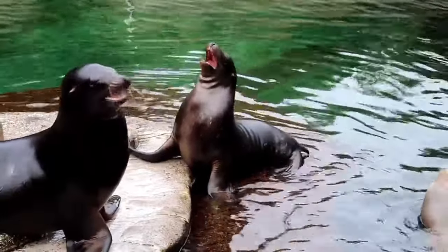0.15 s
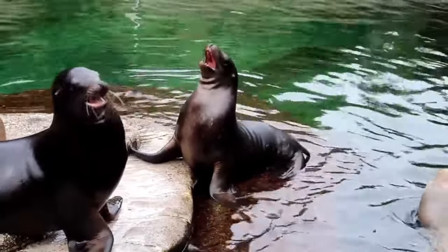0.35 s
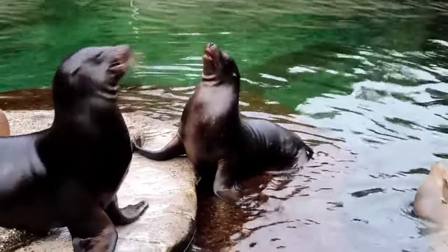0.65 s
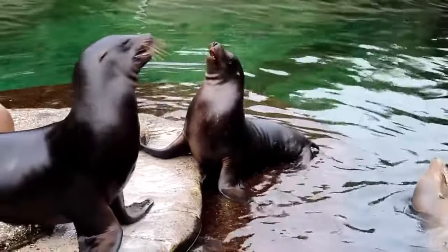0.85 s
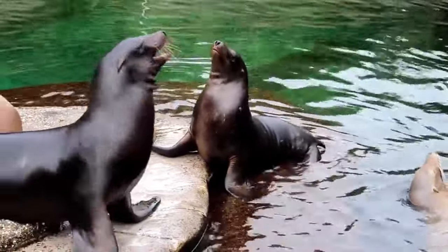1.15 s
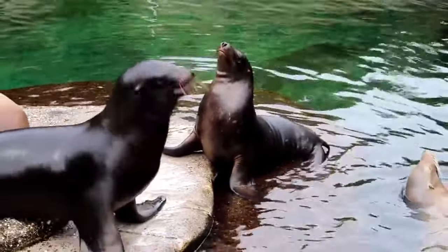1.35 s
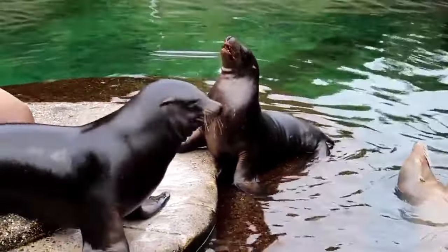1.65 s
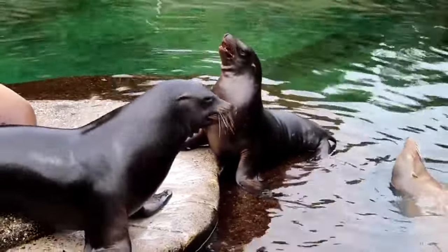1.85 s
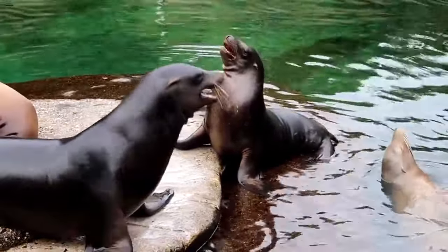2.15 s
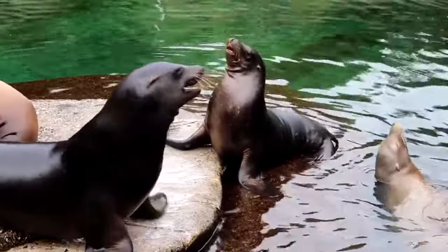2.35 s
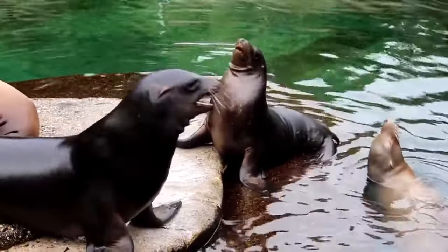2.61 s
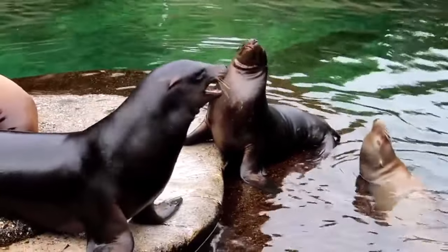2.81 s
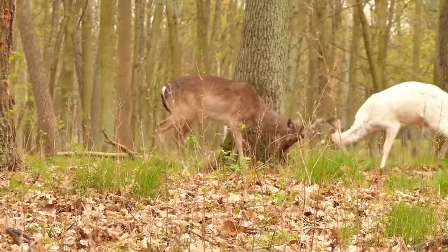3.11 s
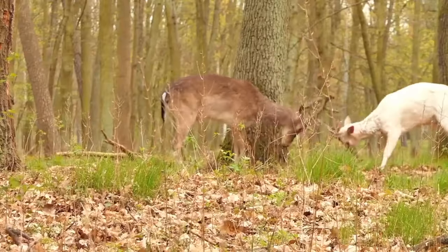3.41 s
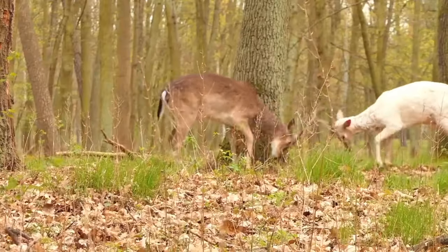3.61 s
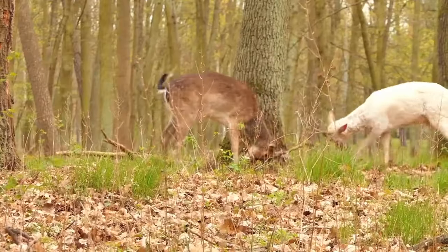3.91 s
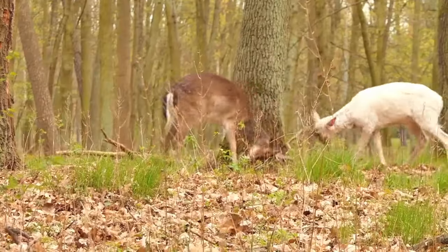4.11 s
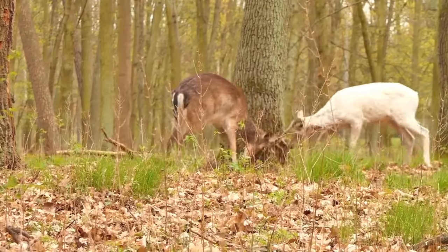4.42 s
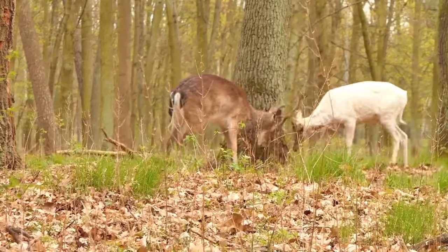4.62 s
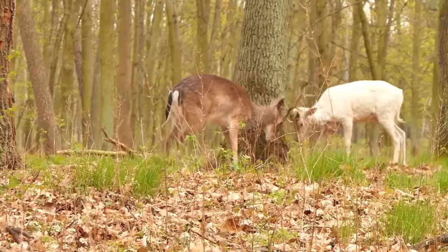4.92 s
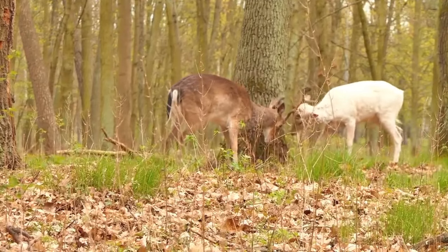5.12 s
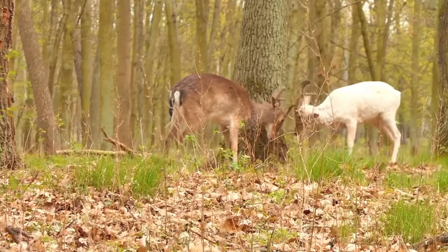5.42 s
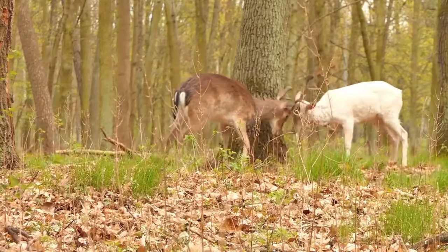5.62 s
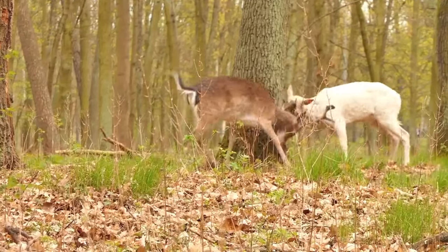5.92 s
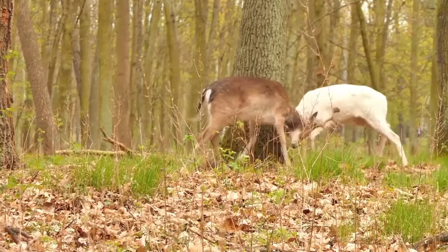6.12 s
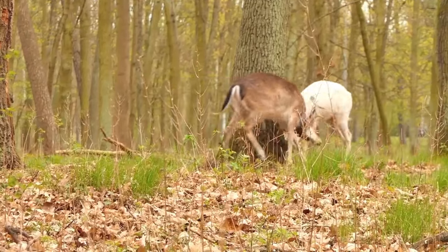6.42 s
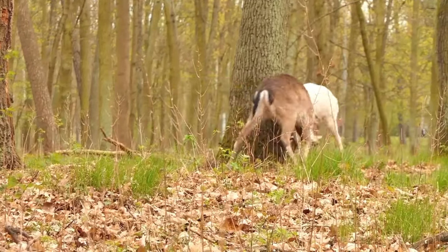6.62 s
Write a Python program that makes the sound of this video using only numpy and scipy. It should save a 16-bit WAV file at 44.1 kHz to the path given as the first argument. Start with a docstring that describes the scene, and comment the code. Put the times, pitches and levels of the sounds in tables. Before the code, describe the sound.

Short high yelping barks over gentle ripples and faint distant hoots, cutting to a hushed forest where a stag bellows low and strained, then begins another.

```python
"""A pool, then a wood, in stereo. By the pool sea lions trade short, squeaky barks (sliding sine tones),
ripples lap and splash (shaped noise), and soft hoots (two sines) carry from far off. In the wood a large
animal, probably a stag, bellows (pulses through throat resonances): the call starts strained, opens, swells and
breaks off. After a pause with only the low hush of the open air (filtered noise), the same bellow begins once
more from its start."""
import sys
import numpy as np
from scipy import signal
from scipy.fft import rfft, irfft, next_fast_len
from scipy.io import wavfile
from scipy.ndimage import uniform_filter1d

SR = 44100
rng = np.random.default_rng(int(sys.argv[2]) if len(sys.argv) > 2 else 0)


def wrap_up_sound(samples):
    """Save the sound to the file named by the first command line argument, as 16-bit audio."""
    columns = np.atleast_2d(samples).T
    # keep every value between -1 and 1, then stretch to whole-number steps
    tamed = np.clip(columns, -1, 1)
    steps = np.round(tamed * 32767).astype(np.int16)
    wavfile.write(sys.argv[1], SR, steps)


N = 297675
TIME = np.arange(N) / SR


def amp(db):
    """Decibels to gain."""
    return 10 ** (np.asarray(db) / 20)


def unit(x):
    """Scales to rms 1."""
    return x / np.sqrt(np.mean(x ** 2) + 1e-20)


def follow(rows, t):
    """The columns of a curve at times t."""
    s, *columns = np.transpose(rows)
    return [np.interp(t, s, column) for column in columns]


def shape(points, hz):
    """A spectrum read on a log-frequency axis."""
    f, value = np.transpose(points)
    return np.interp(np.log(hz + 1), np.log(f + 1), value)


def colour(x, points):
    """Filters x by a spectrum in dB."""
    size = x.shape[-1]
    gain = amp(shape(points, np.fft.rfftfreq(size, 1 / SR)))
    return irfft(rfft(x) * gain, size)


def wander(size, hz):
    """Random drift of rms 1, mostly slower than hz."""
    lowpass = 1 / (1 + (np.fft.rfftfreq(size, 1 / SR) / hz) ** 4)
    return unit(irfft(rfft(rng.standard_normal(size)) * lowpass, size))


def pan(x, left_db):
    """Places a sound between left and right by its level difference, left minus right."""
    left = amp(left_db)
    return np.array([x * left, x]) * 2 / (1 + left)


def pair(size, likeness):
    """Two channels of partly shared white noise."""
    shared = np.clip(likeness, 0, 1)
    common = np.sqrt(shared) * rng.standard_normal(size)
    return common + np.sqrt(1 - shared) * rng.standard_normal((2, size))


def add(mix, s, sound):
    """Mixes a sound in at time s, cut at the end of the mix."""
    part = mix[..., max(round(s * SR), 0):][..., :sound.shape[-1]]
    part += sound[..., :part.shape[-1]]


def echoes(x, t60):
    """Scattered reflections, different in each channel, each band dying at its own speed."""
    sparse = rng.random((2, SR)) < 3000 / SR  # about 3000 reflections a second
    taps = rng.standard_normal((2, SR)) * sparse * (TIME[:SR] > .003)
    hz, t, z = signal.stft(taps, SR, nperseg=256)
    decay = amp(-60 * t / shape(t60, hz)[:, None])
    tail = signal.istft(z * decay, SR, nperseg=256)[1]
    tail = tail / np.linalg.norm(tail, axis=1, keepdims=True)
    return signal.fftconvolve(x, tail, axes=1)[:, :N]


# the pool gives way to the wood at this moment
WOOD_FROM_S = 2.95


def in_wood(fade_s=.05):
    """0 beside the pool, 1 in the wood, with a short crossfade."""
    return np.clip((TIME - WOOD_FROM_S) / fade_s + .5, 0, 1)


# colour of the hush in each place, and of the low rumble: [f/Hz, relative level/dB]
POOL_AIR = [(59, -46), (100, -21.5), (209, -16.5), (281, -6.5), (486, -11.5), (710, -9), (1310, -18),
            (1870, -18.5), (3920, -25), (5490, -25), (6500, -29.5), (8550, -24.5), (15400, -34.5)]
WOOD_AIR = [(35, -33.5), (60, -3), (231, -15), (827, -13), (908, -15), (973, -14), (1620, -23),
            (1780, -26.5), (2350, -31.5), (3920, -32), (8430, -33.5), (9470, -32.5), (15400, -34)]
RUMBLE = [(15, -6.5), (40, -2), (80, -11.5), (120, -2), (200, -14.5), (600, -49), (2000, -78)]
# swells of low rumble, and one short thump at 2.96 s: [peak t/s, half-length/s, level/dB]
RUMBLE_SWELLS = [(1.95, .07, -53.5), (2.11, 0.084, -76), (2.96, .012, -58), (4.2, .42, -59), (6.6, .3, -67)]
# by the pool the hush starts louder and settles
POOL_HUSH_DB, SETTLE_DB, SETTLE_S, WOOD_HUSH_DB = -67.5, 7, 0.58, -61.5
POOL_RUMBLE_DB, WOOD_RUMBLE_DB = -79.5, -76.5  # steady rumble between the swells


def open_air(flutter_db=2.1, drift_db=1):
    """Filtered noise: a soft hush, first of the pool and then of the wood, over a low rumble that swells."""
    wood = in_wood()
    pool_db = POOL_HUSH_DB + SETTLE_DB * np.exp(-TIME / SETTLE_S)
    pool_hush = unit(colour(pair(N, 0.37), POOL_AIR)) * amp(pool_db)
    wood_db = WOOD_HUSH_DB + drift_db * wander(N, 0.72)
    wood_hush = unit(colour(pair(N, 0.45), WOOD_AIR)) * amp(wood_db)
    hush = ((1 - wood) * pool_hush + wood * wood_hush) * amp(flutter_db * wander(N, 20))
    swells = sum(amp(db) * np.exp(-((TIME - s) / half) ** 2) for s, half, db in RUMBLE_SWELLS)
    rumble_gain = (1 - wood) * amp(POOL_RUMBLE_DB) + wood * amp(WOOD_RUMBLE_DB) + swells
    return hush + rumble_gain * unit(colour(pair(N, 0.2), RUMBLE))


# ripples lapping at the rock: [peak t/s, fizz level/dB]; each builds quickly and drains slowly
LAPS = [(.16, -65.5), (.5, -78), (.69, -61), (1.23, -57.5), (1.39, -63.5), (1.91, -68), (2.089, -62),
        (2.181, -54.5), (2.339, -60), (2.57, -61.5)]
LAP_RISE_DB_PER_S, LAP_FALL_DB_PER_S, STILL_WATER_DB = 150, 56, -92
# colour of the fizz: [f/Hz, relative level/dB]
FIZZ_COLOUR = [(200, -15.5), (700, -8.5), (1500, -3.5), (3000, 1.5), (5000, -1), (8500, 2), (13000, 3.5),
               (15500, 2)]


def ripples(flicker_db=2):
    """Noise fizz of lapping water, heard only beside the pool; the strongest lap sets its level."""
    laps = []
    for s, db in LAPS:
        rise = LAP_RISE_DB_PER_S * (s - TIME)
        fall = LAP_FALL_DB_PER_S * (TIME - s)
        laps.append(db - np.maximum(rise, fall))
    fizz_db = np.maximum(np.max(laps, axis=0), STILL_WATER_DB)
    fizz = unit(colour(pair(N, 0.27) * amp(flicker_db * wander(N, 300)), FIZZ_COLOUR))
    return pan(np.ones(N), 0.74) * fizz * amp(fizz_db) * (1 - in_wood())


# the sea lions' barks, before the mouth colours them; those that touch run together into one warble:
# [t/s, length/s, first f/Hz, last f/Hz, lateness of the slide (1 = even), level/dB,
#  base level of the first overtone against the fundamental/dB]
BARKS = [(.074, 0.072, 630, 1076, 1.27, -30.5, -21), (.136, 0.039, 909, 894, 2.1, -28.5, -18),
         (0.166, 0.06, 756, 701, 1.8, -29, -20.5), (0.211, 0.054, 840, 752, 1.8, -30.5, -22),
         (0.249, .07, 672, 709, 1.2, -32.5, -22.5), (0.616, .075, 687, 961, 1.6, -28.5, -20.5),
         (0.707, 0.075, 562, 796, 0.51, -28.5, -18), (0.768, 0.065, 590, 554, 0.8, -34.5, -14.5),
         (1.179, .056, 707, 1185, 1.35, -30, -15), (1.429, 0.053, 787, 1130, 1.6, -29, -15.5),
         (2.017, 0.026, 920, 1038, 0.5, -28, -24), (2.087, 0.045, 920, 980, 1.44, -31, -24),
         (2.947, .059, 900, 2200, 2.3, -20.5, -6)]
# a bark of the usual level opens and shuts in these times; a harder one opens faster
BARK_ATTACK_S, BARK_RELEASE_S, USUAL_BARK_DB = 0.01, .017, -27.5
# soft edge of the tone around each bark's start: level/dB, time scale/s
SOFT_EDGE_DB, SOFT_EDGE_S = -49.5, .008


def syllables(t):
    """Pitch, loudness, overtone level and opening: each bark swells, holds, fades and slides in pitch."""
    total, hz, gain, overtone_db = np.zeros((4, len(t)))
    for start, length, first_hz, last_hz, lateness, db, edge_db in BARKS:
        age = t - start
        attack_s = BARK_ATTACK_S * amp(USUAL_BARK_DB - db)
        ramp = np.minimum(age / attack_s, (length - age) / BARK_RELEASE_S)
        swell = np.sin(np.pi / 2 * np.clip(ramp, 0, 1)) ** 2
        opening = swell + amp(SOFT_EDGE_DB - db) * np.exp(-abs(age) / SOFT_EDGE_S)
        slide = np.sin(np.pi / 2 * np.clip(age / length, 0, 1) ** lateness) ** 2
        total += opening
        hz += opening * first_hz * (last_hz / first_hz) ** slide
        gain += opening * amp(db)
        overtone_db += opening * edge_db
    total += 1e-9
    # where barks overlap, the more open one dominates pitch and overtones
    return hz / total, gain, overtone_db / total, np.minimum(total, 1)


# the sea lion's mouth: [f/Hz, level/dB]
MUZZLE = [(200, -4), (500, 1.5), (1450, 5.5), (2000, -4), (2550, 3.5), (3100, 0), (3650, -11.5),
          (4200, -26), (12000, -45)]


def bark(jitter=0.016, shimmer=0.04, step_db=-5, steepen=0.46, air_db=-44, flicker_db=3, push=0.8):
    """High, nearly pure yelps that slide in pitch; their weak overtones flicker and grow when pushed."""
    size = next_fast_len(int(np.ceil(BARKS[-1][0] + .5) * SR))
    hz, gain, overtone_db, opening = syllables(TIME[:size])
    phase = 2 * np.pi * np.cumsum(hz * (1 + jitter * wander(size, 250))) / SR
    edge_db = overtone_db + push * 20 * np.log10(opening)
    tone = np.sin(phase)
    for k in range(3):
        level_db = edge_db * (1 + steepen * k) + step_db * k + flicker_db * wander(size, 43)
        tone = tone + amp(level_db) * np.sin((k + 2) * phase)
    voice = tone * (1 + shimmer * wander(size, 170)) + amp(air_db) * rng.standard_normal(size)
    return colour(voice * gain, MUZZLE)


# echo times by the pool: [f/Hz, t60/s]
POOL_T60 = [(300, .6), (800, 0.49), (2000, 0.69), (8000, 0.17)]


def sea_lions(left_db=3.5, wet_db=-22, slap_db=-24, slap_s=0.012):
    """The barks, left of centre, with one reflection off the rock and the faint ring of the enclosure."""
    yelps, dry = bark(), np.zeros(N)
    add(dry, 0, yelps)
    add(dry, slap_s, amp(slap_db) * yelps)
    placed = pan(dry, left_db)
    return placed + amp(wet_db) * echoes(placed, POOL_T60)


# faint far-off hoots: [t/s, length/s, f/Hz, level/dB]
HOOTS = [(.35, 0.77, 163, -73.5), (0.211, .39, 414, -66.5), (0.49, 0.036, 352, -54.5),
         (0.702, 0.043, 341, -54.5), (0.837, 0.66, 420, -67), (0.973, .3, 316.6, -57.5),
         (1.632, 0.072, 286, -54.5), (1.867, 0.15, 298.6, -59), (2.154, .43, 275, -67),
         (2.549, .11, 267, -61), (2.776, 0.093, 623, -62), (2.8, 0.18, 319.4, -60)]


def hoots(overtone_db=-13, waver=0.0043, wet_db=-15.5):
    """Soft low calls from far off: a wavering sine and its octave, swelling and fading."""
    out = np.zeros(N)
    for s, length, hz, db in HOOTS:
        size = round(length * SR)
        phase = 2 * np.pi * np.cumsum(hz * (1 + waver * wander(size, 30))) / SR
        tone = np.sin(phase) + amp(overtone_db) * np.sin(2 * phase)
        add(out, s, amp(db) * np.hanning(size) * tone)
    placed = pan(out, 0.67)
    return placed + amp(wet_db) * echoes(placed, POOL_T60)


# small splashes: [t/s, time scale/s, approximate peak level/dB, frequency scale of the spray f/Hz]
SPLASHES = [(0.293, 0.026, -56, 1660), (0.47, 0.05, -58.5, 1700), (0.891, 0.05, -57, 1640),
            (0.94, 0.0042, -65, 2510), (1.359, 0.033, -61, 7200), (1.723, 0.0034, -56.5, 1000),
            (2.845, 0.012, -49, 1660)]


def splashes(grain_db=3):
    """Short bursts of grainy noise that swell fast and die away."""
    out = np.zeros((2, N))
    for s, length, db, hz in SPLASHES:
        t = TIME[:round(3 * length * SR)] / length
        spray = pair(len(t), 0.55) * amp(grain_db * wander(len(t), 400))
        spectrum = [(hz / 12, -10), (hz / 4, 0), (hz * 1.6, 0), (hz * 0.69, -14), (hz * 8, -22)]
        burst = (t / 0.36) ** 2 * np.exp(2 - 2 * t / 0.38)
        add(out, s, amp(db) * unit(colour(spray, spectrum)) * burst)
    return out


def fold_pulses(turns, smear=0.97, count=90):
    """The folds close unevenly along their length, which blurs the upper partials of each pulse."""
    k = np.arange(1, count)
    lag = smear * np.minimum(k / 10, 1) * rng.standard_normal(len(k))
    return unit(sum(np.cos(2 * np.pi * n * turns - late) for n, late in zip(k, lag)))


def throat(x, resonances, stretch, ripple_db=4.0, size=1024):
    """Rings x through steep-sided resonances that slide with stretch; pulses get a sharp front and a tail."""
    frames = dict(fs=SR, nperseg=size, noverlap=size * 3 // 4, nfft=size * 2)
    hz, t, z = signal.stft(x, **frames)
    upper = np.minimum(hz[:, None] / 2000, 1)  # the lowest resonances hardly move
    hz = hz[:, None] / (1 + (np.interp(t, TIME[:len(x)], stretch) - 1) * upper)
    power = sum(amp(db) ** 2 / (1 + 2 * ((hz - f) / width) ** 2) ** 2 for f, width, db in resonances)
    # soft throat walls never hold still: single partials swell and fade
    smoothing = np.outer(np.hanning(16), np.hanning(60))
    ripple = unit(signal.fftconvolve(rng.standard_normal(z.shape), smoothing, "same"))
    log_gain = np.log(np.sqrt(power / power.mean(0)) * amp(ripple_db * upper * ripple))
    # minimum phase: the ringing follows each pulse
    mirrored = np.vstack([log_gain, log_gain[-2:0:-1]])
    causal = np.exp(signal.hilbert(mirrored, axis=0).conj())[:len(hz)]
    return signal.istft(z * causal, **frames)[1][:len(x)]


def steadied(x):
    """Takes out slow changes of level."""
    power = uniform_filter1d(uniform_filter1d(x ** 2, size=900), size=900)
    return x / np.sqrt(abs(power) + 1e-12)


# each bellow: [t/s, length/s]; the second repeats the course of the first
BELLOWS = [(2.95, 2.03), (6.2937, .5)]
# the pitch climbs, jumps at each change of register and collapses at the end: [t/s, f/Hz]
PITCH = [(3.0, 109.7), (3.17, 132.6), (3.28, 144.1), (3.41, 149.8), (3.49, 158.3), (3.8, 171.6),
         (4.03, 177.3), (4.06, 182.8), (4.3, 188.2), (4.54, 190), (4.71, 188.1), (4.83, 178.6),
         (4.865, 149.5), (4.94, 142.8)]
# the force, before the final trims:
# [t/s, lower partials level/dB, upper partials level/dB, left minus right of the lower partials/dB]
FORCE = [(3.08, -31.5, -32.5, 6), (3.284, -28, -30.5, 5.5), (3.448, -31.5, -38.5, 6),
         (3.558, -17, -28, 1.5), (3.698, -12.5, -27.5, 2.5), (3.758, -14.5, -24.5, 5.5),
         (4.136, -15.5, -21.5, 8), (4.236, -15.5, -24.5, 0), (4.35, -11, -24, -3.5),
         (4.57, -9.5, -23.5, -1.5), (4.67, -13, -23, -4.5), (4.78, -17, -26.5, 7), (4.87, -16, -27.5, -0.5)]
# the throat: [t/s, posture (0 strained, 1 open, 2 full, 3 closing),
#  shift of the upper resonances as the neck stretches/factor]
POSTURE = [(3.1, 0.5, 1.01), (3.25, 0.29, 1.044), (3.43, 0.56, 0.98), (3.49, 0.88, 0.9), (3.97, 1, 0.98),
           (4.06, 2.5, 0.96), (4.5, 2.5, 1.004), (4.72, 2.8, 0.956), (4.86, 3, 1.07)]
# throat resonances in each posture: [f/Hz, width/Hz, level/dB]
STRAINED = [(140, 12, -1.5), (254, 72, -3), (451.3, 43, 4), (549.3, 130, -29.5), (867, 71, -5.5),
            (1098, 66, 2.5), (1760, 240.6, -14), (2020, 90, -8.5), (2304, 89, -7), (2545, 97, -5),
            (3113, 150, -11.5), (3490, 90, -8), (4113, 90, -17), (4785, 180, -28.5), (6320, 280, -36),
            (7070, 49, -32), (8800, 540, -47), (13900, 2800, -53.5)]
OPEN = [(320, 59, -10), (503, 40.3, 5), (683, 220, -13), (874, 180, -10.5), (1028, 17, -15),
        (1161.5, 39, -13), (1430, 160, -24), (1815, 35, -11.5), (2280, 300, -22.5), (3027, 297, -25),
        (3913, 120, -24.5), (4570, 540, -34.5), (5950, 560, -35), (7530, 1100, -48), (14300, 2800, -63.5)]
FULL = [(190, 44, -17), (368, 110, -3), (574.6, 35, 8.5), (980, 330, -15.5), (1139, 89, -5.5),
        (1740, 40, -21), (1855, 170, -12.5), (2230, 180, -23), (2724, 75, -19.5), (3910, 170, -24),
        (3878, 140, -20), (4282, 110, -26), (5600, 900, -34), (6960, 110, -36), (8620, 400, -45.5),
        (12800, 1100, -64)]
CLOSING = [(358, 62, -6.5), (412, 79, 12), (701.4, 300, -16.5), (1200, 110, -18), (1840, 440, -20.5),
           (2837, 480, -20.5), (3810, 140, -17.5), (4900, 1100, -29.5), (12370, 5900, -59)]
# air torn by the vocal folds, relative to their pulses: [f/Hz, level/dB]
RASP = [(60, -4.5), (450, -9.5), (900, 4), (2500, 8), (6000, 7), (9000, 20.5), (15000, 18)]
# the voice is clear except where it starts, changes register and breaks off:
# [t/s, rasp level/dB, how long it lingers/s]
CRACKS = [(2.97, -3, .25), (3.48, -18.5, 0.015), (4.05, -17, 0.036), (4.892, 1.5, 0.038)]
CLEAR_RASP_DB = -26.5
BELLOW_ATTACK_S, BELLOW_RELEASE_DB_PER_S = 0.13, 304


def bellow(length, jitter=.04, shimmer=0.53, puff_decay=0.54, bright_db=-0.5, bright_left_db=4):
    """Vocal-fold pulses and puffs of air pass a throat that changes posture; rasp shakes the pulses."""
    age = TIME[:round(length * SR)]
    t = BELLOWS[0][0] + age
    hz, = follow(PITCH, t)
    chest_db, upper_db, left_db = follow(FORCE, t)
    posture, stretch = follow(POSTURE, t)
    cracks = sum(amp(db) * np.exp(-abs(t - s) / linger) for s, db, linger in CRACKS)
    rasp = amp(CLEAR_RASP_DB) + cracks

    turns = np.cumsum(hz * (1 + jitter * rasp * wander(len(t), 90))) / SR
    folds = fold_pulses(turns) * (1 + shimmer * rasp * wander(len(t), 130))
    puffs = unit((1.6 + np.exp(-(turns % 1) / puff_decay)) * rng.standard_normal(len(t)))
    drive = folds + rasp * colour(puffs, RASP)

    voice = np.zeros(len(t))
    for k, resonances in enumerate((STRAINED, OPEN, FULL, CLOSING)):
        share = np.maximum(1 - abs(np.clip(posture, 0, 3) - k), 0)
        if share.any():
            voice += share * throat(drive, resonances, stretch)

    # lower and upper partials each follow their own level curve
    chest = signal.sosfiltfilt(signal.butter(5, 1450, fs=SR, output="sos"), voice)
    lower = pan(amp(chest_db) * steadied(chest), left_db)
    upper = pan(amp(upper_db + bright_db) * steadied(voice - chest), bright_left_db)
    attack = np.minimum(age / BELLOW_ATTACK_S, 1) ** 2
    release = amp(-BELLOW_RELEASE_DB_PER_S * np.maximum(t - FORCE[-1][0], 0))
    return (lower + upper) * attack * release


# added lean, left in the deepest partial and right in the hiss: [f/Hz, left minus right level/dB]
LEAN = [(185, 3.5), (330, 1), (2200, -1), (4000, 0.5), (9000, -0.5)]
# echo times in the wood: [f/Hz, t60/s]
WOOD_T60 = [(150, 0.45), (450, 0.3), (1500, 0.3), (4000, 0.27), (12000, 0.08)]
# scatter off the trees before its trim, and reflections from the sides: [f/Hz, level/dB]
SCATTER = [(200, -24), (600, -21), (1500, -11), (4000, -6), (10000, -2)]
WIDTH = [(150, -17.5), (370, -17.5), (560, -27), (2000, -29.5), (4500, -23.5), (9000, -8.5)]


def stag(level_db=-0.87, wet_db=1.0):
    """The bellows among trees, which scatter the upper partials most."""
    dry = np.zeros((2, N))
    for s, length in BELLOWS:
        add(dry, s, bellow(length))
    left = colour(dry[0], [(hz, db / 2) for hz, db in LEAN])
    right = colour(dry[1], [(hz, -db / 2) for hz, db in LEAN])
    dry = np.array([left, right])
    wet = echoes(dry, WOOD_T60)
    # reflections arriving from the sides reach the two channels in opposite phase
    sideways = wet - wet[::-1]
    return amp(level_db) * (dry + amp(wet_db) * colour(wet, SCATTER) + colour(sideways, WIDTH))


def scene():
    """All sources together."""
    return open_air() + ripples() + sea_lions() + hoots() + splashes() + stag()


EDGE_HZ = 15500


def record(dry):
    """The recorder's band limit: a steep low-pass at the edge."""
    lowpass = signal.firwin(511, EDGE_HZ, window=("kaiser", 9), fs=SR)
    return signal.oaconvolve(dry, lowpass[None], "same")


dry = scene()
out = record(dry)
wrap_up_sound(out)
```